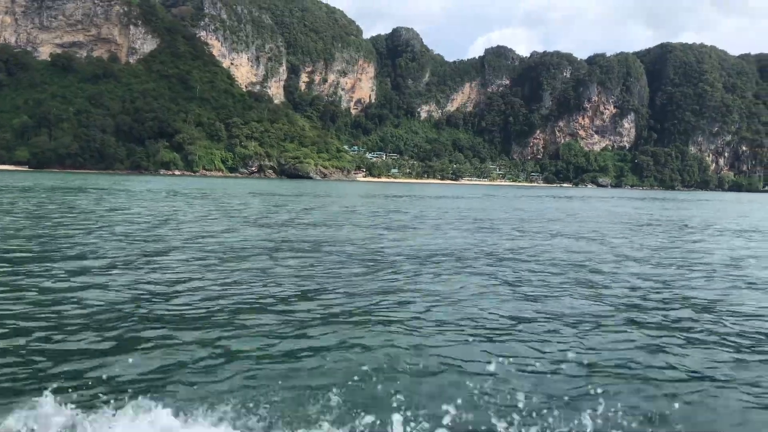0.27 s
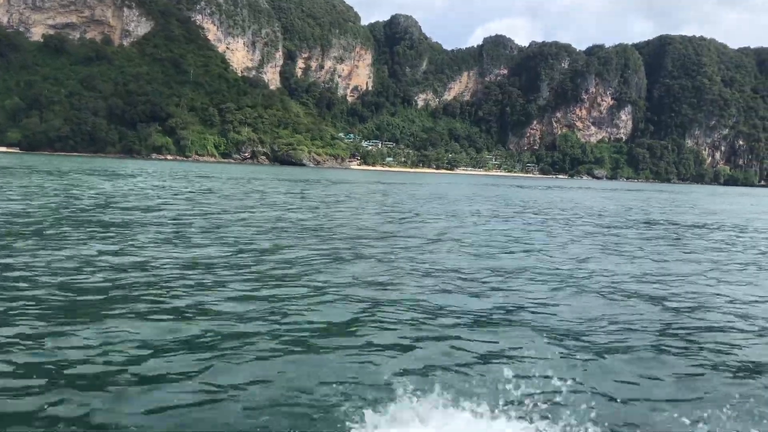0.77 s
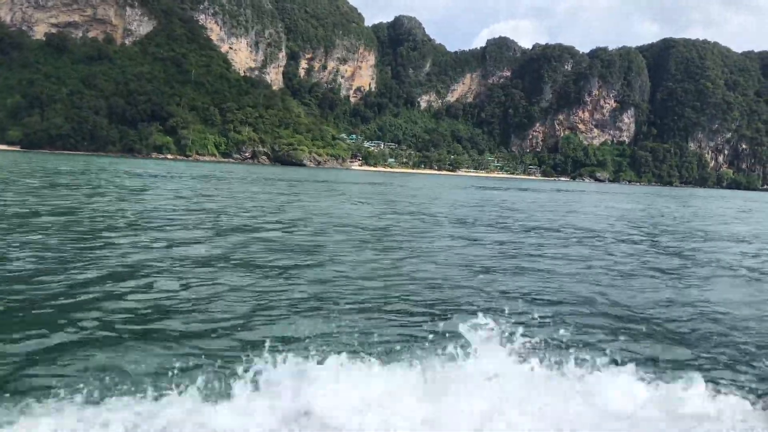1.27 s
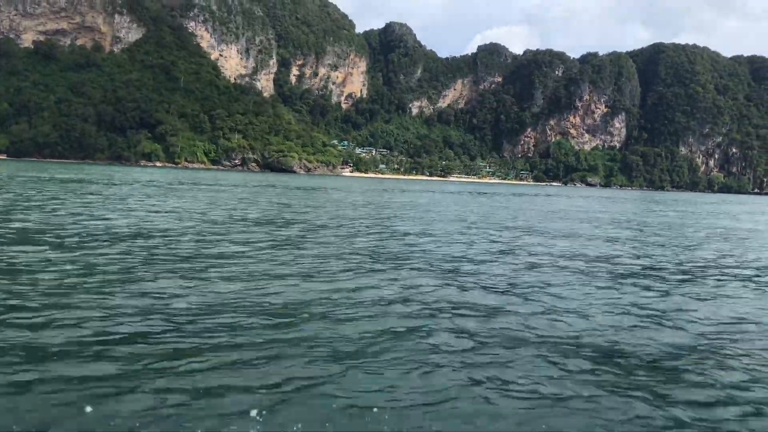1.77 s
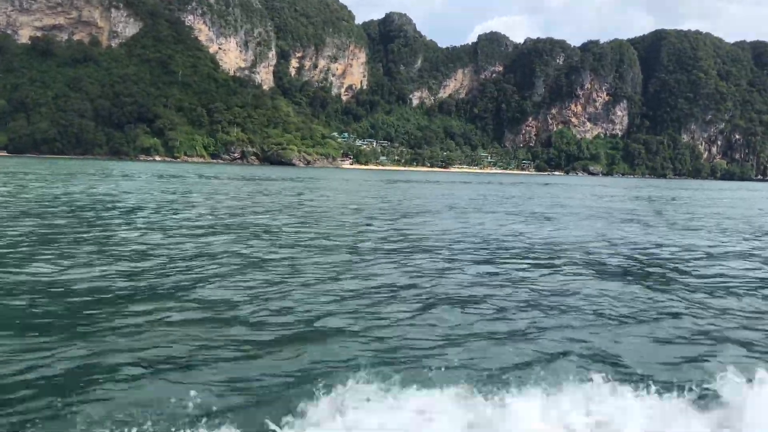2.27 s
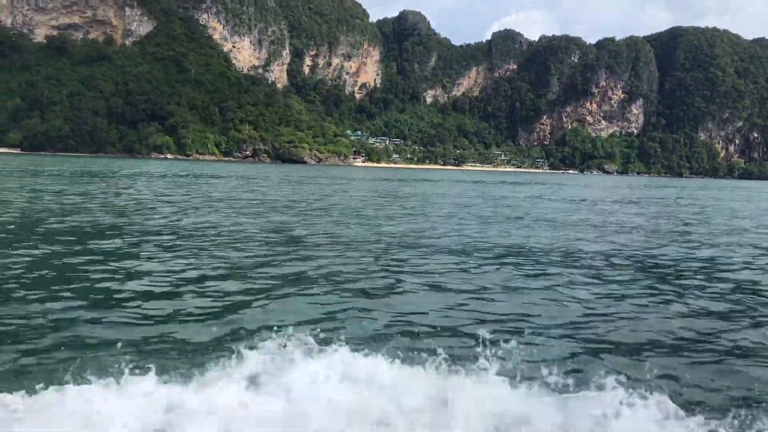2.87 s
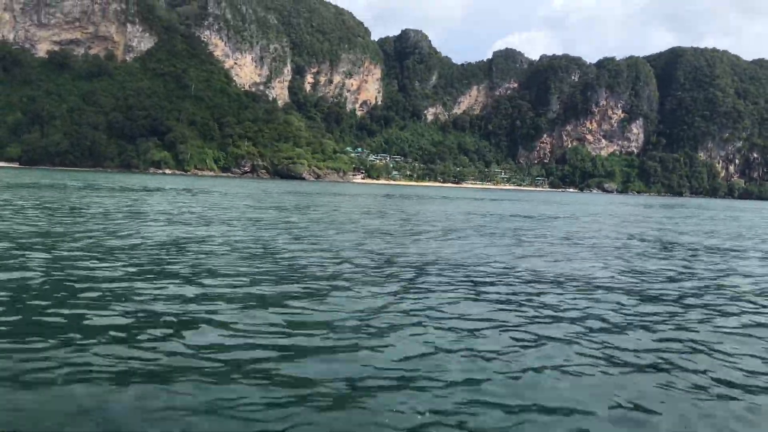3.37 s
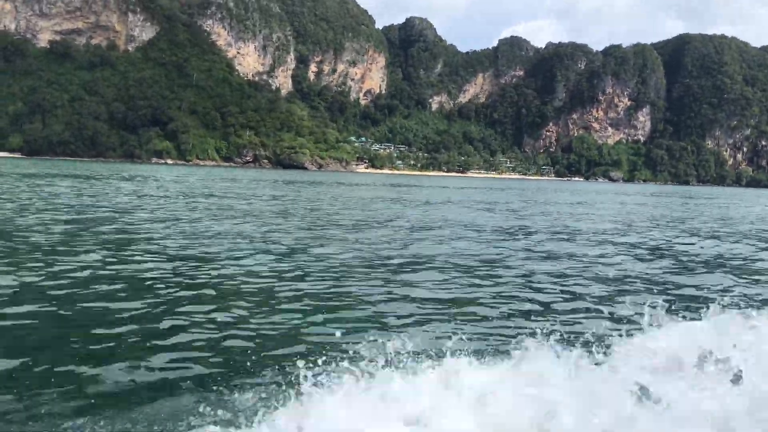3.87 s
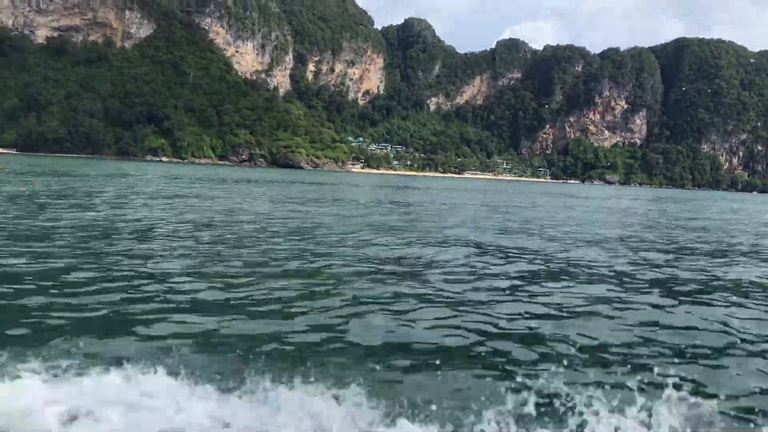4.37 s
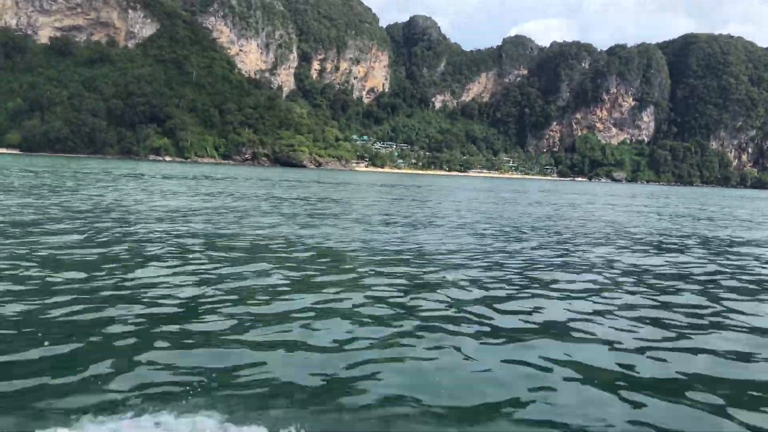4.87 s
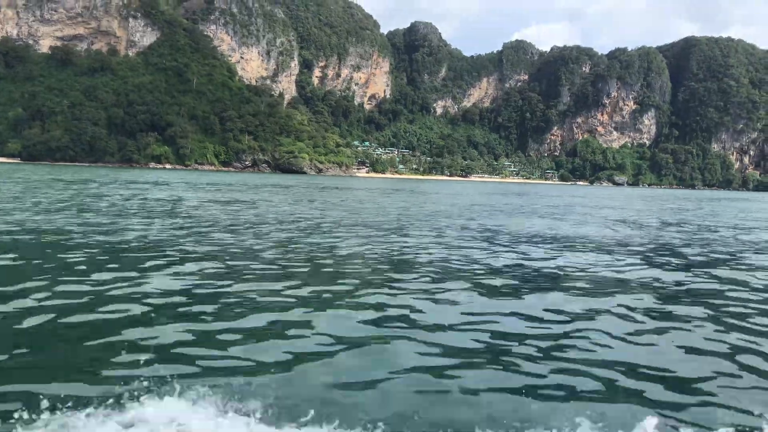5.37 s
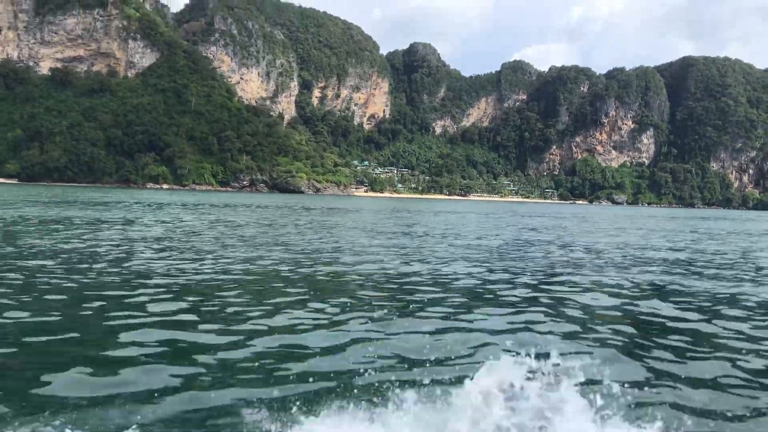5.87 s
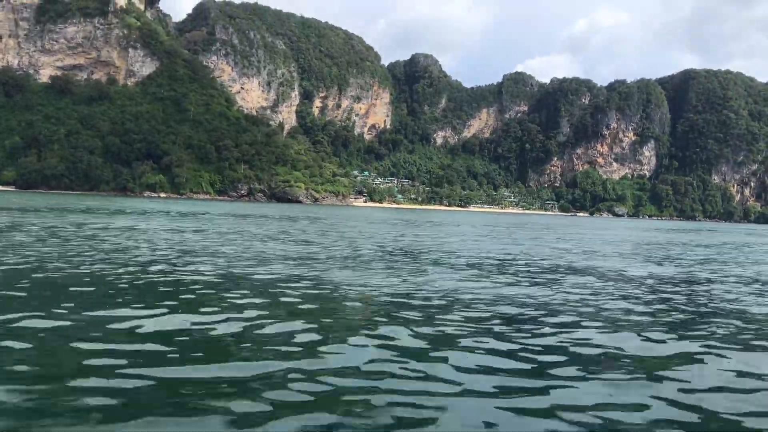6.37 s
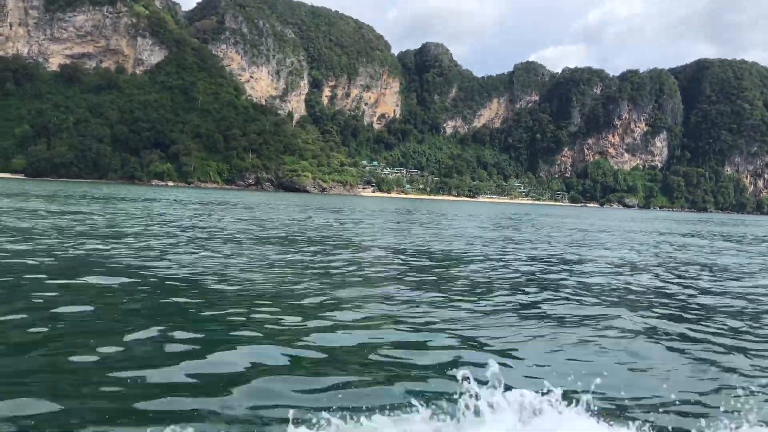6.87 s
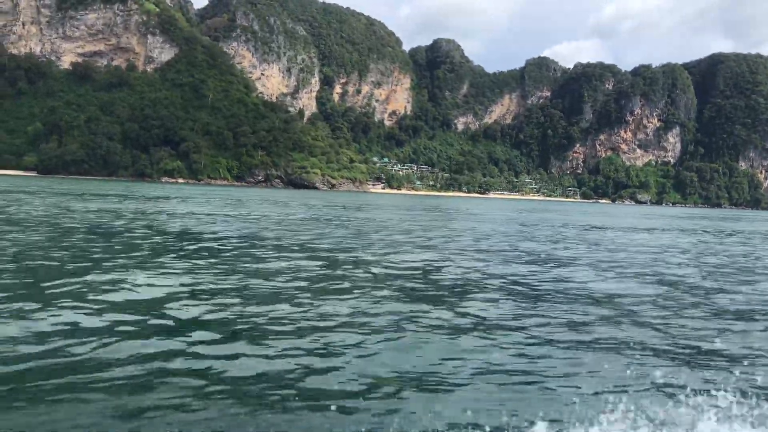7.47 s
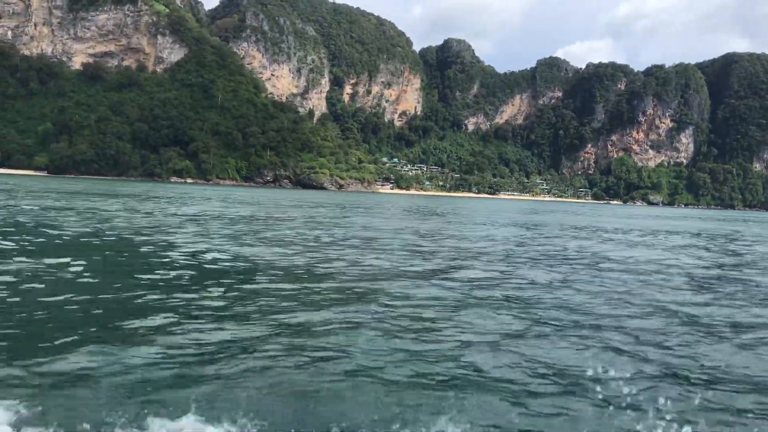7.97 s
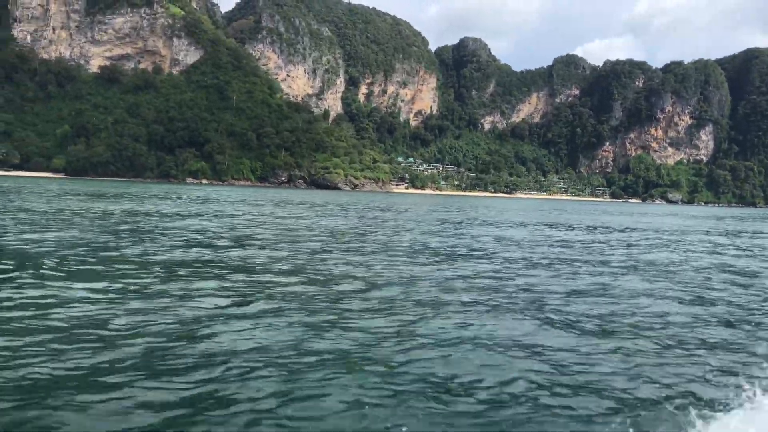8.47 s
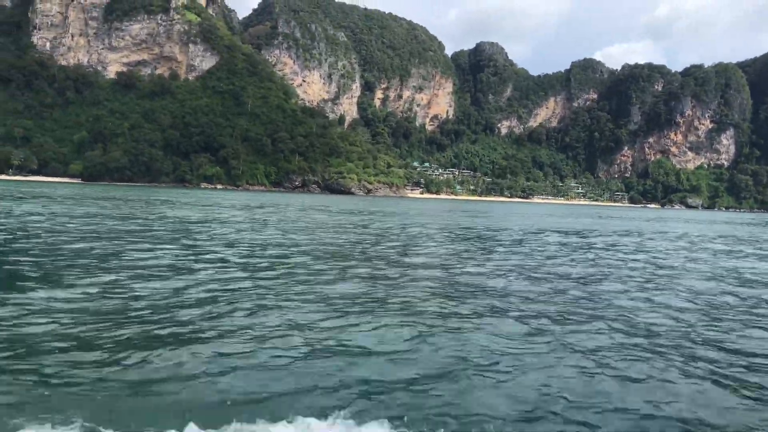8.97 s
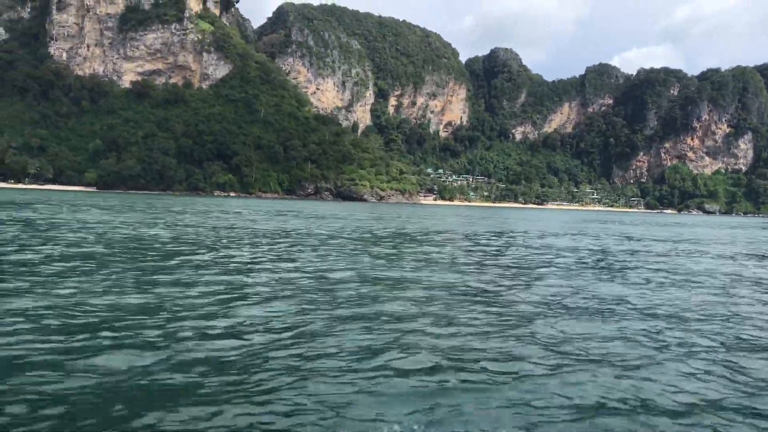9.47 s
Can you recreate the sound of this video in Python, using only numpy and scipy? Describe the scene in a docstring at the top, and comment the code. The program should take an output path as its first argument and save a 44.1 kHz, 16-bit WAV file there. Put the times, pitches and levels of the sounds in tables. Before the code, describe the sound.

Deep, constant motorboat drone with fast knocking, over gushing bow waves, light splashes of spray and low gusts of wind.

```python
"""Long-tail boat on open water

Heard from on board, a four-cylinder engine drones through its exhaust pipe, and each firing knocks the
block into resonance. The engine speeds up and sags with the swell. Turbulent water rushes along the
hull, the bow gushes into waves and throws hissing spray, and the head wind buffets the microphone."""
import sys
import numpy as np
from scipy import signal
from scipy.fft import rfft, irfft, next_fast_len
from scipy.io import wavfile
from scipy.ndimage import uniform_filter1d, minimum_filter1d

SR = 44100
rng = np.random.default_rng(int(sys.argv[2]) if len(sys.argv) > 2 else 0)


def materialize(psi):
    """Save the field psi as 16-bit PCM at rate SR to the path in sys.argv[1].

    A 1-D psi becomes a single channel; in a 2-D psi each row is a channel.
    """
    bounded = np.clip(np.atleast_2d(psi).T, -1, 1)
    quanta = np.round(bounded * 32767).astype(np.int16)
    wavfile.write(sys.argv[1], SR, quanta)


N = 428211

# engine speed, rising and sagging with the swell: time_s, firing_rate_hz
ENGINE_SPEED = [(0.0, 75.9), (0.71, 77.35), (1.11, 73.05), (1.94, 77.02), (2.52, 73.97), (3.54, 78.01),
                (3.74, 74.97), (4.44, 75.5), (5.03, 77.4), (5.65, 74.33), (6.32, 77.88), (6.74, 75.33),
                (7.29, 75.96), (7.7, 74.92), (8.18, 76.19), (8.63, 73.59), (9.34, 74.49), (9.7, 73.68)]
# slow course of the firing tone's harmonics at cruising speed: time_s, second_db, third_db
HARMONIC_LEVELS = [(0.0, -36, -23.5), (2.4, -32, -25.5), (3.6, -35.5, -23), (4.6, -28, -24.5),
                   (6.2, -31, -23), (7.2, -33.5, -24), (9.7, -32, -23.5)]
# weaker exhaust lines, with quarter orders from unequal cylinders: firing_rate_multiple, relative_db
EXHAUST_LINES = [(0.75, -43), (1.25, -41), (1.5, -34.5), (2.25, -46), (2.5, -43), (2.75, -51),
                 (3.25, -48.5), (3.5, -36.5), (3.75, -46.5), (4, -36), (4.25, -46.5), (4.5, -43.5),
                 (4.75, -52.5), (5, -37), (5.25, -47.5), (5.5, -40.5), (5.75, -54), (6, -56), (7, -52),
                 (7.25, -46.5), (7.5, -51.5), (8.5, -49.5), (9, -50.5), (9.25, -55), (9.5, -52.5),
                 (9.75, -50.5), (10, -48), (10.25, -56.5), (10.5, -53)]
# hull panels that sing when an exhaust line sweeps through them: pitch_hz, width_hz, lift_db
HULL_PANELS = [(312, 24, 5), (374, 20, 4), (692, 15, 11), (738, 30, 3.5)]
# slow gain shared by the exhaust growl and the hull wash: time_s, gain_db
GROWL_GAIN = [(0.0, -1.0), (1.6, -0.9), (4.4, -1.5), (5.2, -3), (7.5, -1.47), (9.7, -1.5)]
# the cylinders in firing order: knock_strength_db, lateness_periods
FIRING_ORDER = [(-4.5, 0.033), (-4, 0.06), (-3, 0.011), (-2, 0.03)]
# resonant modes of block and pipe: pitch_hz, width_hz, base_level_db
BLOCK_MODES = [(554, 89, -46.5), (781, 140, -55.5), (893, 110, -52.5), (977, 98, -53), (1099.7, 45, -48.5),
               (1273, 73, -50.5), (1450, 180, -54), (1846, 240, -54.5), (2023, 240, -52),
               (2993, 310, -53.5), (3216, 280, -56), (3616, 320, -61), (4380, 650, -65.5),
               (5930, 1500, -71.5)]
# spectrum of water along the hull: frequency_hz, relative_density_db
WASH_SPECTRUM = [(25, -30.5), (70, -4), (130, -2), (200, -4), (300, -7), (400, -11.5), (470, -10.5),
                 (580, -11.5), (680, -17), (1250, -19.5), (1650, -27), (2500, -36), (7000, -56.5),
                 (15000, -64)]
# the bow throws spray: peak_s, rise_s, level_db
SPRAY_BURSTS = [(.15, .06, -56), (1.38, .22, -57), (1.6, .1, -57.5), (2.22, 0.13, -53.5),
                (2.7, 0.32, -56.5), (2.88, 0.086, -53.5), (3.55, 0.1, -61), (4.16, .2, -54.5),
                (5.23, .06, -56), (5.87, .1, -55), (7.06, 0.27, -63), (7.61, .08, -59), (7.87, .08, -61.5),
                (8.8, 0.14, -64)]
# spectrum of falling spray: frequency_hz, relative_density_db
SPRAY_SPECTRUM = [(400, -1.5), (1200, 13), (2500, 5.5), (4200, 3), (5000, -3), (6700, -2.5), (7600, -9.5),
                  (9400, -10), (10500, -19), (12500, -10), (15500, -19)]
# the bow ploughs into a wave, water gushes and the engine labours: peak_s, half_length_s, strength_ratio
WAVE_IMPACTS = [(0.223, .15, .45), (1.28, .16, 0.7), (1.64, 0.3, 0.86), (2.86, 0.35, 0.8), (3.578, .1, .55),
                (4.139, 0.36, 0.92), (5.898, 0.21, 1), (6.86, .17, 0.8), (7.9, .12, .3),
                (8.798, 0.11, 0.46), (9.25, .2, 0.6)]
# spectrum of gushing water: frequency_hz, relative_density_db
GUSH_SPECTRUM = [(200, -14), (420, 0.5), (550, 1.5), (800, -2), (1250, 1.5), (1650, -8), (2050, -3),
                 (2600, -15.5), (4000, -20), (9000, -46)]
# gusts on the microphone: peak_s, half_length_s, level_db, firing_tone_dip_db
WIND_GUSTS = [(0.723, 0.092, -28, 2.5), (1.79, 0.13, -19.5, 1.3), (3.39, .14, -17, 2.5),
              (3.62, 0.065, -17, 0.5), (4.6, 0.13, -25, -0.5), (4.977, .12, -29.5, 0.8),
              (5.496, 0.06, -22.5, 0.5), (6.44, 0.14, -21.5, 2.7), (7.562, .06, -27, 1.5),
              (9.414, 0.054, -20.5, 0.5)]
# spectrum of the head wind: frequency_hz, relative_density_db
WIND_SPECTRUM = [(15, -40), (25, -24.5), (38, -5.5), (60, -2), (100, -2), (130, -11.5), (200, -15.5),
                 (400, -31.5), (1000, -71), (4000, -110)]


def from_db(db):
    """Amplitude ratio of a level in decibels."""
    return np.exp(np.asarray(db) * (np.log(10) / 20))


def unit_rms(x):
    """Normalisation to unit mean power."""
    return x / np.sqrt(np.mean(x ** 2) + 1e-20)


def in_time(rows):
    """Linear interpolation of each column of a time table at every sample."""
    times, *columns = np.transpose(rows)
    return [np.interp(np.arange(N) / SR, times, column) for column in columns]


def drift(rate_hz, hop=40, settle=2000):
    """Low-pass noise of unit spread: a slow random modulation."""
    pole = np.exp(-2 * np.pi * hop * rate_hz / SR)
    noise = rng.standard_normal(N // hop + settle + 2)
    slow = signal.lfilter([1], [1, -2 * pole, pole * pole], noise)[settle:]
    return np.interp(np.arange(N) / hop, np.arange(len(slow)), unit_rms(slow))


def surge(peak_s, rise_s, fall_s):
    """Gaussian envelope of height 1, with separate rise and fall."""
    t = np.arange(N) / SR - peak_s
    return np.exp(-(t / np.where(t < 0, rise_s, fall_s)) ** 2)


def colour(noise, spectrum):
    """Spectral shaping of a noise, at unit power."""
    size = next_fast_len(N)
    hz, db = np.transpose(spectrum)
    bins_hz = np.arange(size // 2 + 1) * SR / size
    gain = from_db(np.interp(np.log(bins_hz + 1), np.log(hz), db))
    return unit_rms(irfft(rfft(noise, size) * gain, size)[:N])


def resonate(x, hz, width_hz):
    """Two equal resonators in cascade give steep skirts; the output has unit power."""
    r = np.exp(-np.pi * width_hz / SR)
    section = [1 - r, 0, r - 1, 1, -2 * r * np.cos(2 * np.pi * hz / SR), r * r]
    return unit_rms(signal.sosfilt([section, section], x))


def exhaust_drone(firings, speed_hz, tone_db=-12, flutter=0.028, waver_db=2.0, second_db_per_hz=1.6):
    """Harmonic series of a nearly square pressure wave; speed makes it lopsided, lifting harmonic two."""
    dip_db = sum(dip * surge(s, half, half) for s, half, _, dip in WIND_GUSTS)
    second_db, third_db = in_time(HARMONIC_LEVELS)
    even_db = second_db + second_db_per_hz * (speed_hz - speed_hz.mean()) + waver_db * drift(1.2)
    angle = 2 * np.pi * firings
    tone = from_db(tone_db - dip_db) * (1 + flutter * drift(3.9)) * np.cos(angle)
    second = from_db(even_db) * np.cos(2 * angle - 2.6)
    third = from_db(third_db) * (1 + flutter * drift(12)) * np.cos(3 * angle - 0.98)
    return np.sqrt(2) * (tone + second - third)


def exhaust_growl(firings, speed_hz, unsteady=.2, gain_db=1.0, puff_periods=2.09, smear_rad=1.24):
    """Line spectrum of the strongest cylinder's puff, once a cycle, wavering as combustion varies."""
    out = 0
    for multiple, db in EXHAUST_LINES:
        lift_db = sum(peak_db / (1 + (2 * (multiple * speed_hz - hz) / width) ** 2)
                      for hz, width, peak_db in HULL_PANELS)
        gain = from_db(db + gain_db + lift_db - lift_db.mean()) * (1 + unsteady * drift(3))
        phase = smear_rad * rng.standard_normal() + unsteady * drift(0.81)  # the pipe smears the puff
        out = out + gain * np.cos(2 * np.pi * multiple * (firings - puff_periods) + phase)
    return np.sqrt(2) * out


def engine_knock(firings, load_db, rise_periods=.07, fall_periods=0.26, rattle=.12,
                 force_scatter_db=1.5, mode_scatter_db=1.96, snap_hz=1500, load_hz=2800):
    """Modal excitation: each firing drives the block with a snap and a rough burst, over a rattle."""
    periods = firings + .5
    firing_index = periods.astype(int)
    strength_db, lateness = np.array(FIRING_ORDER)[firing_index % len(FIRING_ORDER)].T
    age = np.maximum(periods % 1 - lateness, 0)
    scatter = rng.standard_normal((1000, len(BLOCK_MODES) + 1))
    force = from_db(strength_db + force_scatter_db * scatter[firing_index, -1])
    burst = np.minimum(age / rise_periods, 1) * np.exp(-age / fall_periods) * force
    at_peak = np.diff(1. * (age > rise_periods), prepend=0) > 0
    snaps = unit_rms(force * at_peak)
    out = 0
    for k, (hz, width, db) in enumerate(BLOCK_MODES):
        mode_gain = from_db(mode_scatter_db * scatter[:, k])[firing_index]
        rough = unit_rms(np.hypot(burst * mode_gain, rattle) * rng.standard_normal(N))
        # the low modes repeat alike from firing to firing, the high ones ring anew each time
        clean = (-1) ** k * 0.76 / (1 + (hz / snap_hz) ** 4) * snaps
        # harder combustion lifts the high modes most
        gain = from_db(db + load_db * min(hz / load_hz, 1))
        out = out + gain * resonate(rough + clean, hz, width)
    return out


def hull_wash(base_db=-31.5, churn_db=1.8):
    """Turbulence along the hull radiates broadband noise that flickers as the water churns."""
    churn = rng.standard_normal(N) * from_db(churn_db * np.minimum(drift(36), 2))
    return from_db(base_db) * colour(churn, WASH_SPECTRUM)


def bow_spray(steady_db=-58.5, fall_s=0.077, drops_per_s=3000, drop_db=-8.5, waver_db=1.6):
    """Random impacts of droplets of many sizes merge into a hiss that swells with each splash."""
    drops = (rng.random(N) < drops_per_s / SR) * rng.standard_normal(N)
    hiss = rng.standard_normal(N) + from_db(drop_db) * unit_rms(drops)
    splash_power = sum((from_db(db) * surge(s, rise, fall_s)) ** 2 for s, rise, db in SPRAY_BURSTS)
    envelope = np.sqrt(from_db(steady_db) ** 2 + splash_power)
    return envelope * from_db(waver_db * drift(6)) * colour(hiss, SPRAY_SPECTRUM)


def bow_gush(waves, full_wave_db=-43.5, churn_db=4.0):
    """Water displaced by the bow makes turbulent noise in proportion to the wave's strength."""
    churn = rng.standard_normal(N) * from_db(churn_db * drift(25))
    return from_db(full_wave_db) * waves * colour(churn, GUSH_SPECTRUM)


def head_wind(breeze_db=-30.5, lumpy_db=2.0):
    """Eddies at the microphone make low pressure fluctuations; breeze and gusts add in power."""
    eddies = rng.standard_normal(N) * from_db(lumpy_db * drift(5.9))
    gust_power = sum((from_db(db) * surge(s, half, half)) ** 2 for s, half, db, _ in WIND_GUSTS)
    return np.sqrt(from_db(breeze_db) ** 2 + gust_power) * colour(eddies, WIND_SPECTRUM)


def scene(inertia_s=.2, hunting=.001, full_effort_hz_per_s=1.7, wave_load_db=2.7):
    """Superposition of engine, water and wind; one crankshaft locks exhaust and knock in phase."""
    cruise_hz = uniform_filter1d(in_time(ENGINE_SPEED)[0], int(inertia_s * SR))
    speed_hz = cruise_hz * (1 + hunting * drift(10.4))
    firings = .24 + np.cumsum(speed_hz) / SR  # crank position in firing periods
    waves = sum(strength * surge(s, half, half) for s, half, strength in WAVE_IMPACTS)
    # an accelerating engine knocks and growls more and churns up more water
    effort = np.tanh(np.gradient(cruise_hz) * SR / full_effort_hz_per_s)
    load_db = -1.33 + 0.5 * effort + wave_load_db * waves
    growl_gain = from_db(in_time(GROWL_GAIN)[0] + 0.12 * effort)
    exhaust = exhaust_drone(firings, speed_hz) + growl_gain * exhaust_growl(firings, speed_hz)
    knock = engine_knock(firings, load_db)
    water = growl_gain * hull_wash() + bow_gush(waves) + bow_spray()
    return (exhaust + knock + water + head_wind())[None]


def limiter(x, ceiling=0.59, window=1200):
    """Peak limiting: the gain ducks briefly when a gust lifts the drone above the ceiling."""
    allowed_gain = np.minimum(1, ceiling / (np.abs(x) + 1e-9))
    return x * uniform_filter1d(minimum_filter1d(allowed_gain, window), window)


def record(dry, fade_in_s=.006, cutoff_hz=15700):
    """Band limiting: a steep low-pass filter follows the limiter and a short fade-in."""
    fade_in = np.sin(np.pi / 2 * np.minimum(np.arange(N) / SR / fade_in_s, 1)) ** 2
    low_pass = signal.ellip(10, .1, 80, cutoff_hz, fs=SR, output="sos")
    return signal.sosfilt(low_pass, limiter(dry) * fade_in)


dry = scene()
out = record(dry)
materialize(out)
```